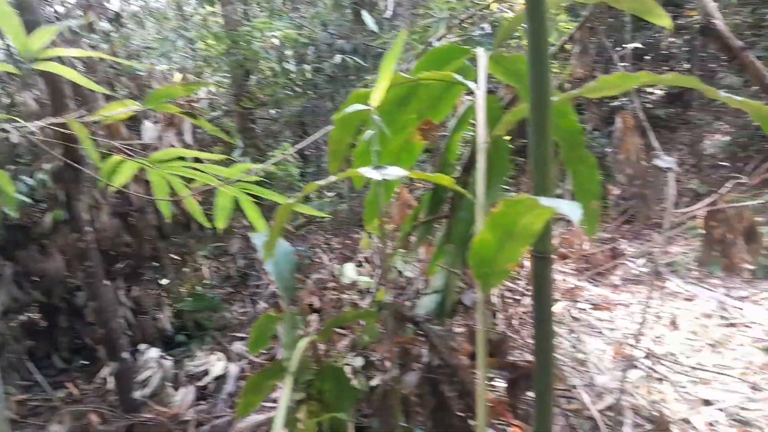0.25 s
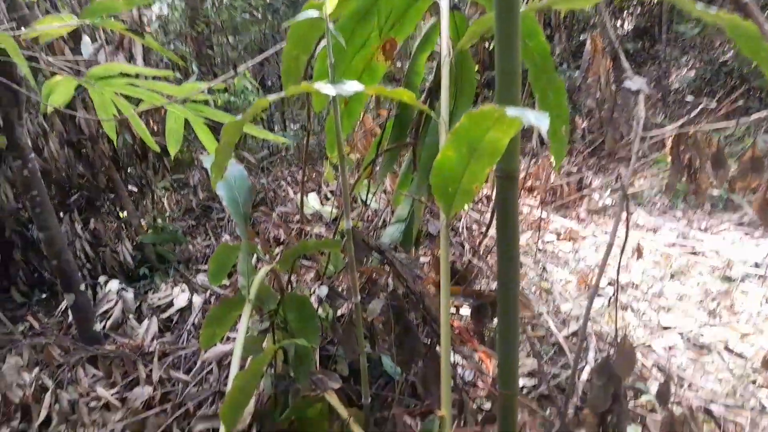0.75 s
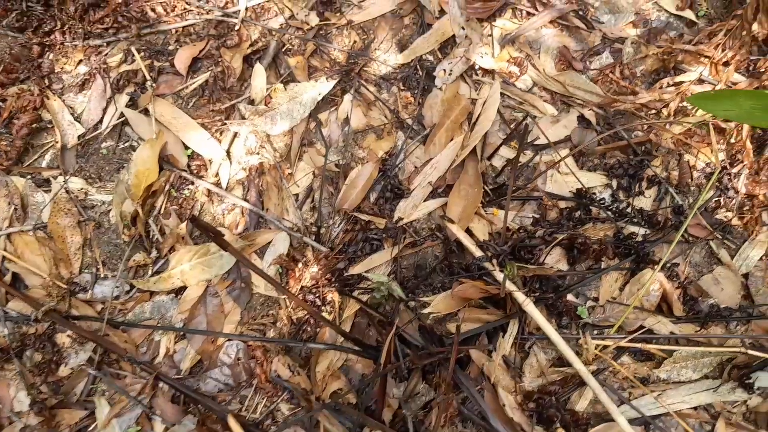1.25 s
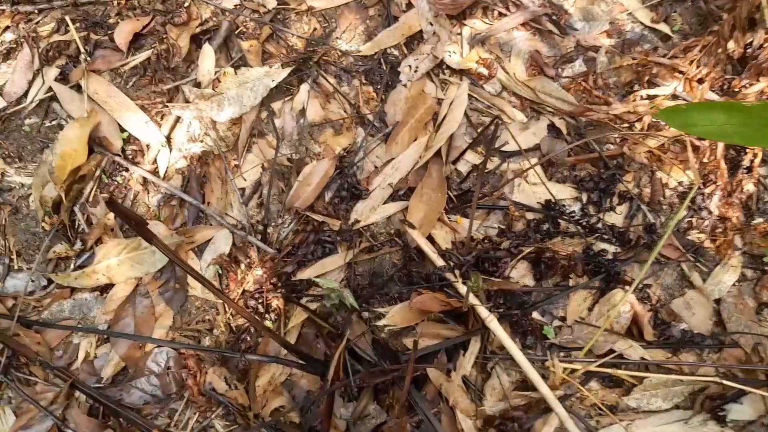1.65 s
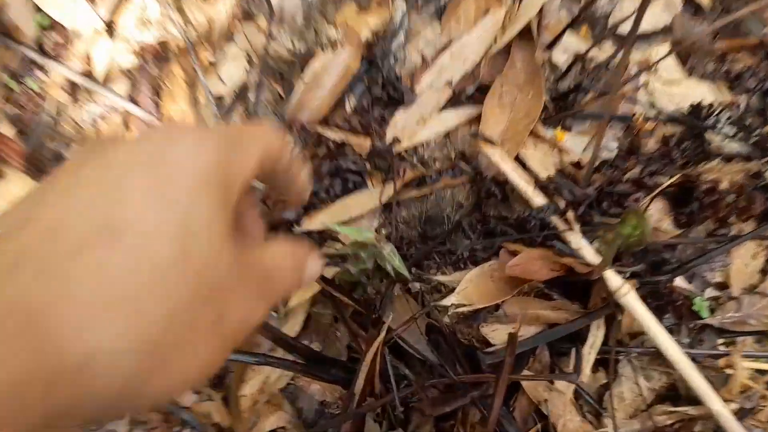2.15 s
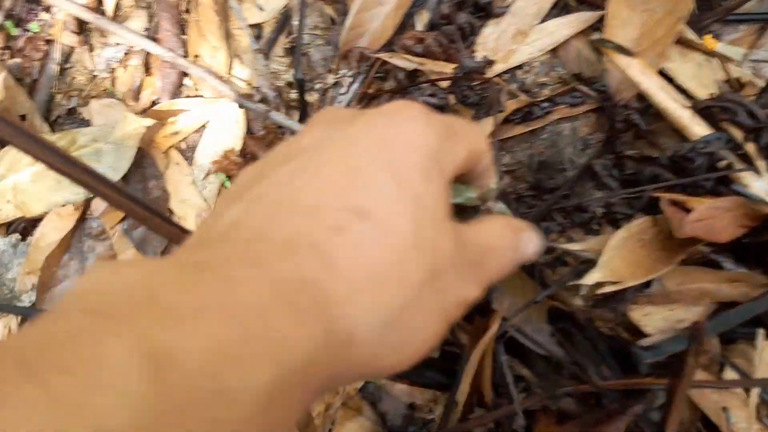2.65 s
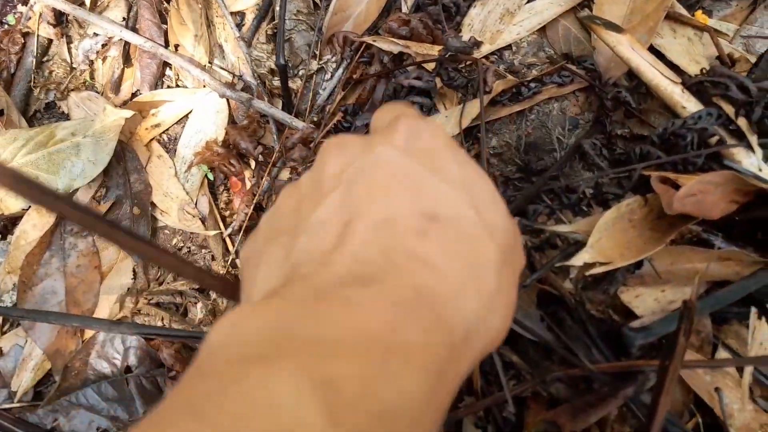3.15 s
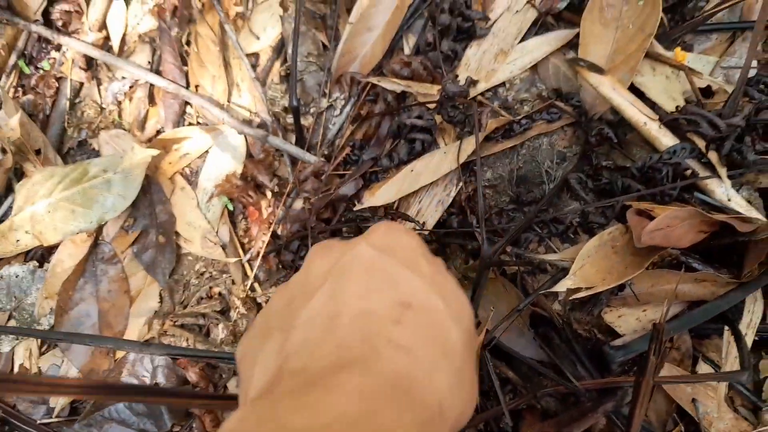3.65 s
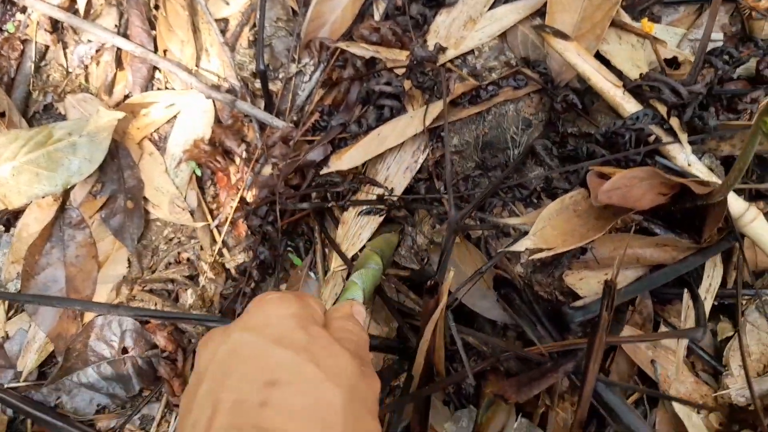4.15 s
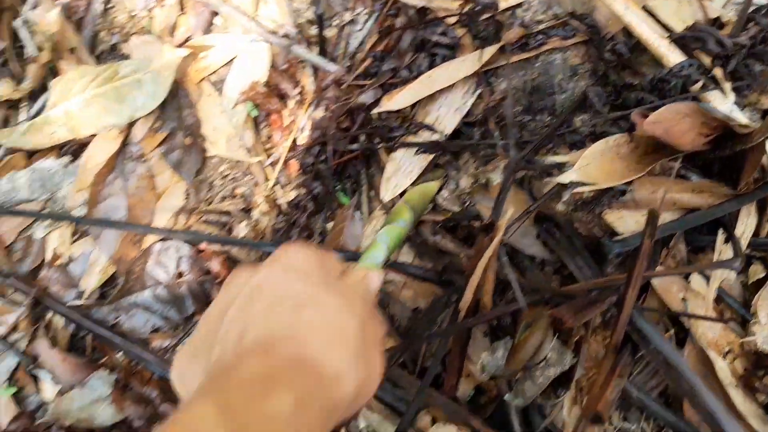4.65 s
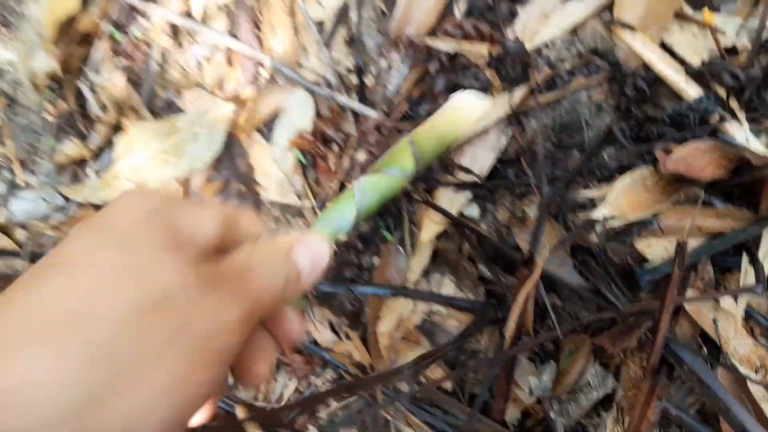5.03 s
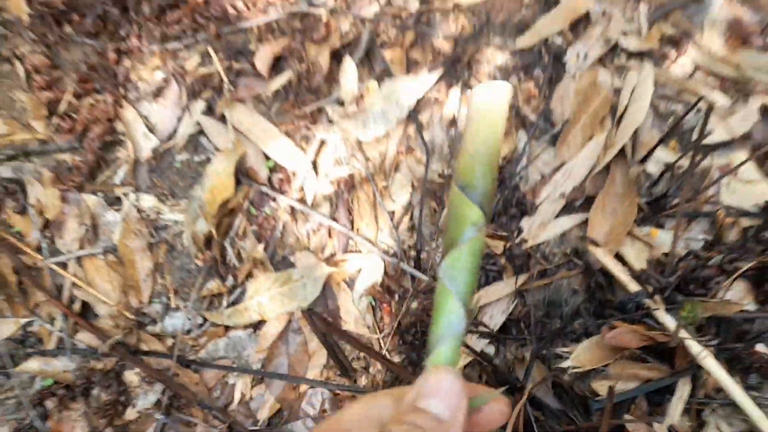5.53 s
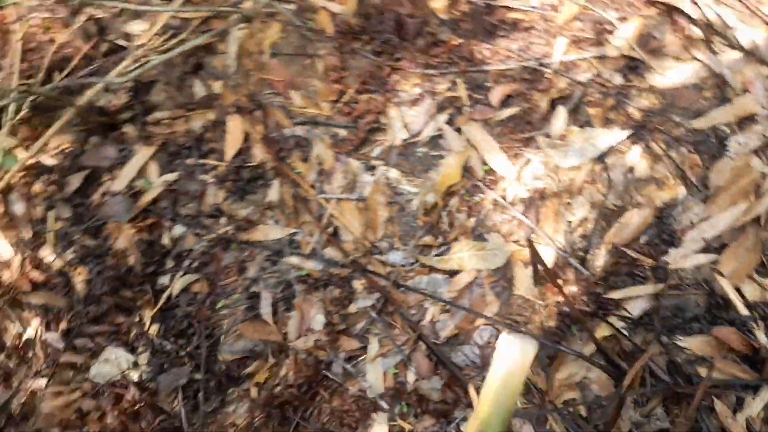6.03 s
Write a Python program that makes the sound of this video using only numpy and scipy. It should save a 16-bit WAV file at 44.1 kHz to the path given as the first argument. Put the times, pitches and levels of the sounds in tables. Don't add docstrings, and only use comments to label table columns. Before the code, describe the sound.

A hand-held stereo microphone close to a dry forest floor. From 0 to 0.95 s leaves rustle softly over a thin cricket trill and raspy cicadas; a distant bird whistles a rising, a falling and a low note, and a rough foot scuff bursts at 0.85-0.95 s before an abrupt cut. The cicadas become quieter. Soft bumps at 1.46 and 1.8 s and a stuttering finger lead to rustling and leaf ticks from 2 s, with grip creaks near 2.65 s. High chips and faint calls sound around 3-3.5 s. Very loud, dry snaps hit at 3.85-3.97 s, then fibres pop from 4.0 to 4.7 s, and another cluster of cracks comes at 4.75-4.86 s. Rustle and small ticks settle. From 5.7 s the three-note whistle returns nearer; from 5.9 s leaves crunch underfoot while low handling rumble and creaking swell to the end at 6.3 s.

```python
import sys
import numpy as np
from scipy import signal
from scipy.fft import rfft, irfft, next_fast_len
from scipy.io import wavfile
from scipy.ndimage import uniform_filter1d, map_coordinates

SR = 44100
rng = np.random.default_rng(int(sys.argv[2]) if len(sys.argv) > 2 else 0)


def put_to_file(sound):
    columns = np.atleast_2d(sound).T
    safe = np.clip(columns, -1, 1)
    whole_steps = np.round(safe * 32767)
    wavfile.write(sys.argv[1], SR, whole_steps.astype(np.int16))


def gain_from_db(level_db):
    decades = np.asarray(level_db, float) / 20
    return 10 ** decades


N = 277389
SCENE_CHANGE_S = 0.957


# peak t/s, level/dB, swell t/s, fade t/s, extra dull level/dB
STIRS = [(.37, -58, 0.59, 1.94, -9), (1.22, -80, .1, 0.31, -25), (.73, -74, 0.08, 0.13, 6),
         (2.0, -71.5, 0.46, 0.82, 6.5), (2.2, -53.5, 0.73, 0.76, -12.5), (2.3, -60.5, 0.56, 0.072, -0.5),
         (2.5, -62, 0.77, 1.3, -14), (3.08, -71, 0.054, 0.27, -4), (3.44, -62, 0.23, 1.1, -21),
         (4.42, -64, 0.66, 0.33, -21), (4.82, -65, 0.3, 0.38, 1), (4.91, -56.5, 0.76, 0.064, -9.5),
         (5.31, -66, 0.98, 0.84, -25), (5.61, -61.5, 0.54, 5.7, -47), (5.84, -62, 0.86, 0.099, -2.5),
         (6.0, -61.5, 0.24, 0.53, 4.5), (6.1, -52, 0.51, 0.69, 1.5), (6.25, -72, 0.73, 0.51, 13)]
# dull level/dB, crisp level/dB, fizz level/dB
CALM = [
    (-99, -71, -80),
    (-106, -99, -98),
]
# f/Hz, level per Hz/dB
DULL = [(350, -16), (600, -10.5), (704, -10), (1090, -4.5), (2600, -12), (3380, -50), (5720, -120)]
CRISP = [(1400, -41.5), (1750, -13), (2600, -15), (3500, -15), (4300, -12.5), (5100, -16.5), (6000, -15.5),
         (7800, -13), (8500, -16.5), (9300, -44)]
FIZZ = [(7500, -57), (9300, -10), (10800, -6), (14000, -8), (15600, -8), (15800, -33), (16000, -120)]


def litter():
    dull_calm, crisp_calm, fizz_calm = np.transpose(CALM)
    dull_db = swells(STIRS, 1, by_scene(*dull_calm))
    crisp_db = swells(STIRS, 0.57, by_scene(*crisp_calm))
    fizz_db = swells(STIRS, 0, by_scene(*fizz_calm))
    happens = rng.random(N) < 300 / SR * gain_from_db(5 * wobble(14))
    cracks = happens * gain_from_db(np.minimum(4 * rng.exponential(size=N), 12))
    grain = 1 + 1.9 * signal.lfilter([1], [1, -.97], cracks)
    dull = coloured(pair(0.038) * grain ** 0.48, DULL)
    crisp = coloured(patchy(pair(0.028), 1.5) * grain ** 0.6, CRISP)
    fizz = coloured(pair(0.029) * grain ** 0.51, FIZZ)
    rustle = gain_from_db(dull_db + 1.5 + 2 * wobble(26)) * dull
    rustle += gain_from_db(crisp_db + 6.5 + wobble(11)) * crisp
    return rustle + gain_from_db(fizz_db - 5.5 + 0.24 * wobble(27)) * fizz


# t/s, level/dB
SCUFF = [
    (.83, -66),
    (.845, -46),
    (.884, -49),
    (.887, -35),
    (.9, -37),
    (.925, -39.5),
    (.955, -44.5),
    (.958, -65),
]
# f/Hz, level per Hz/dB
DRAG = [(59, -19), (100, -4.5), (500, -6), (1500, -14.5), (1780, -6), (2070, -8.5), (2670, 1), (3090, -3),
        (7850, -2), (9300, -15), (13000, -11.5), (15800, -10)]


def scuff():
    level_db = curve(SCUFF) + 0.4 * wobble(300) + 1.03 * wobble(90)
    return gain_from_db(level_db) * coloured(pair(0.022), DRAG)


# f/Hz, width f/Hz, level/dB
WOODY = [(505, 690, -1), (1600, 2230, 3.5), (2520, 3080, 2.5)]
BRITTLE = [(4180, 1810, 3), (5700, 2460, 4), (7880, 1380, -4.5)]
BRIGHT = [(11300, 5200, -3), (14130, 2700, -0.5)]


def snapping(rows):
    t = np.arange(SR // 25) / SR
    parts = np.zeros((3, 2, N + len(t)))
    for s, db, woody_db, bright_db, pan_db in rows:
        main = gain_from_db(-60 * t / (0.0056 + db / 14000))
        tail = gain_from_db(-13 - 60 * t / 0.018) + gain_from_db(-28 - 60 * t / 0.035)
        shape = (main + tail) * np.minimum(t / 0.0001, 1)
        shared, own = rng.standard_normal(len(t)), rng.standard_normal((2, len(t)))
        shared[round(0.0001 * SR)] += 5
        bursts = (shared + np.array([.3, .7, .8])[:, None, None] * own) * shape
        bursts *= np.linalg.norm(shape) / np.linalg.norm(bursts, axis=2, keepdims=True)
        gains = gain_from_db(db + np.array([woody_db + 6.5, 8, bright_db + 5]))[:, None]
        gains = gains * gain_from_db(np.outer([.2, 1, 1], [pan_db, -pan_db]) / 2)
        start = round(s * SR)
        parts[..., start:start + len(t)] += gains[..., None] * bursts
    x = sum(resonant(p[:, :N], modes) for p, modes in zip(parts, (WOODY, BRITTLE, BRIGHT)))
    x[1] = filtered(x[1], lambda hz: gain_from_db(6.3 * (hz / 13000) ** 2) * np.exp(-2j * np.pi * hz * 0.00011))
    return x + gain_from_db(-24) * forest(x.mean(0))


def cracks_of(rows, wood_db, bright_db):
    return [(s, db, wood_db, bright_db - 0.5 * (db + 43), pan_db) for s, db, pan_db in rows]


# t/s, peak level/dB, woody level/dB, bright level/dB, left-right level/dB
TWIGS = [(2.7348, -45, -3, -6, 14), (2.7369, -44.5, -5, 1, 6), (2.7405, -47, -5, -4, -9),
         (3.8507, -12.5, -16.5, -2.5, 5), (3.942, -11, -4, -16, -1), (3.9436, -14.5, -6, -22, -4),
         (3.9573, -21.5, -3, -11, -17), (3.9713, -14, -8, -10, 4.5), (4.0034, -35.5, -9, 1, -4),
         (4.4532, -38, -5, -4.5, -8), (4.7345, -36, -9, -24, 8), (4.77, -27, -13, -6.5, 5),
         (4.7916, -26, -4, -18, -18.5), (4.8076, -28, -2, -3, 14), (4.8155, -22.5, -5.5, -19, -11),
         (4.823, -18.5, -3.5, -10, 7.5), (4.8569, -33, -4.5, -8.5, -5), (4.9901, -55.5, 16, -36.5, 4),
         (3.078, -61.5, 10, -12, 4), (3.092, -61, 8, -10, 2), (1.147, -67.5, -5, -20, -12)]


def twigs():
    return snapping(TWIGS)


# t/s, peak level/dB, left-right level/dB
FIBRES = [(2.3797, -42, -5.5), (2.517, -41.5, -6), (2.5717, -43, 2), (3.3132, -61, -25), (3.832, -55, -9),
          (3.9804, -38.5, -6), (3.9885, -46, -2), (4.008, -34, 6), (4.0506, -42, -2), (4.2359, -36.5, -3),
          (4.2872, -31.5, -1), (4.3139, -38, -2), (4.3222, -32.5, 0), (4.3608, -39, -3), (4.3898, -35.5, 2),
          (4.412, -52.5, -5), (4.43, -42.5, -3), (4.4605, -39, -2), (4.5007, -32, -3), (4.5184, -54, -4),
          (4.5587, -34, -4.5), (4.6097, -31.5, -4), (4.7004, -43, 17), (4.7043, -41, -11),
          (4.7144, -35, 8.5), (4.7394, -36, -7), (4.762, -54, 2), (4.8195, -30, -9), (4.9569, -44, -9),
          (5.1074, -47, -11)]


def fibres():
    return snapping(cracks_of(FIBRES, wood_db=-59, bright_db=-0.5))


# t/s, peak level/dB, left-right level/dB
CRUNCH = [(5.9254, -33, 5.5), (5.9294, -35.5, 12), (5.941, -62, 6), (6.002, -35, -5), (6.048, -38, -4),
          (6.108, -35.5, -3), (6.137, -36, -4), (6.247, -38, -5), (6.0838, -36.5, -16), (6.0961, -36.5, -4),
          (6.1624, -32, 2), (6.1706, -35.5, 13), (6.2053, -34.5, 13), (6.2382, -33.5, 9), (6.2681, -34, 13),
          (6.2746, -32, -8)]


def last_step():
    return snapping(cracks_of(CRUNCH, wood_db=4.5, bright_db=-4))


# t/s, peak level/dB, left-right level/dB
TICKS = [(2.0378, -57, -5), (2.182, -52, -7), (2.2288, -44.5, -5), (2.3171, -56, -5.0), (2.336, -49, -13),
         (2.3595, -52, 0), (2.4149, -38, -2.0), (2.4594, -54, -3.0), (2.6314, -52, -7.5), (2.6576, -48, -5),
         (2.6786, -40.5, 5), (2.0535, -44, -8), (2.2899, -46, -4), (2.5035, -54, 4), (2.5533, -53, -1),
         (2.8028, -66, 4), (3.2984, -58.5, 5), (3.3862, -56, -15), (3.4451, -55, -17), (3.551, -49, -7),
         (3.6446, -59, -7), (3.6905, -61, -10), (3.7174, -59, -3), (5.051, -47, -7), (5.3403, -55, -13.5),
         (5.3976, -60, -17), (5.459, -51, -6), (5.4814, -60, -13), (5.5823, -46.5, -12), (5.662, -56, -5),
         (5.7256, -52, -12), (5.7347, -49, -8), (5.879, -51, -16)]


def leaf_ticks():
    return snapping(cracks_of(TICKS, wood_db=-15, bright_db=-3))


# peak t/s, rumble level/dB, swell t/s, fade t/s, rubbing over rumble level/dB
GRIP = [(.36, -75, 0.43, 0.96, 8), (1.44, -76.5, 1.4, 1.3, -30), (1.73, -66, 0.06, .45, -2),
        (1.84, -56, 0.3, 0.22, -5), (1.96, -72.5, 0.64, 0.24, 14), (2.12, -61, 0.77, 0.2, 1),
        (2.3, -69, 0.23, 0.17, 6), (2.65, -48.5, 0.11, 0.16, -0.5), (4.25, -69, 0.19, 0.11, -2),
        (4.87, -72, 0.49, 3, -9), (5.23, -86.5, 0.067, 0.2, 18.5), (1.125, -82, .03, 0.041, 13),
        (1.39, -63, 0.009, 0.055, -21), (5.76, -76, 0.15, 0.46, 19), (5.99, -47, 0.38, 0.19, -9),
        (6.13, -40, 0.27, 0.76, -17), (6.29, -36, 0.14, 0.25, -8)]
# f/Hz, level per Hz/dB
RUMBLE = [(15, -59.5), (45, -7), (70, 0.5), (92, -6), (161, -14), (260, -23.5), (340, -30), (570, -120)]
RUBBING = [(110, -43), (180, -7), (338, -4), (559, -4), (1000, -22.5), (1300, -64), (2200, -120)]


def grip():
    rumble_db, rub_db = swells(GRIP, 0, -77.5), swells(GRIP, 0.86, -107)
    rumble = gain_from_db(rumble_db + 7) * unit(gain_from_db(1.65 * wobble(22)) * coloured(pair(0.099), RUMBLE))
    rub = gain_from_db(rub_db) * unit(gain_from_db(2.5 * wobble(70)) * coloured(pair(.9), RUBBING))
    near = gain_from_db(np.clip((rumble_db + 92.5) * 0.05, 0, 5) * [[1], [-1.5]])
    return near * (rumble + rub)


# f/Hz, time to fall 60 dB t/s
CASE = [
    (112, 0.051),
    (1400, 0.0078),
]


def slipping(rows):
    slips, t = np.zeros(N + SR), np.arange(SR // 5) / SR
    (boom_hz, boom_t60), (tick_hz, tick_t60) = CASE
    for s, db, boom_db, hz in rows:
        scatter = np.clip(rng.standard_normal(2), -1.5, .6)
        tick = gain_from_db(-7 + 5.9 * scatter[0]) * ring(t, tick_hz * (1 + 0.22 * scatter[1]), tick_t60, 0.000067)
        boom = gain_from_db(boom_db + 2.5) * ring(t, boom_hz, boom_t60, 0.0053)
        knock = gain_from_db(12.5) * ring(t, hz, 0.012, 0.0011)
        slips[round(s * SR):][:len(t)] += gain_from_db(db) * (boom + knock + tick)
    return through_case(slips)


def through_case(x):
    return np.array([np.roll(x, 20), x])[:, :N] * gain_from_db([[3], [-8]])


# t/s, peak level/dB, boom level/dB, f/Hz
CREAKS = [(1.947, -51, -28, 490), (2.074, -41, -26, 300), (2.099, -45.5, 0, 298), (2.128, -50.5, 0, 360),
          (2.599, -46.5, 3, 380), (2.609, -48, -12, 430), (2.619, -44, -13, 420), (2.628, -36, 5, 480),
          (2.641, -34.5, 6, 256), (2.658, -33.5, 1, 445), (2.674, -34.5, -10, 225), (2.679, -38, 10, 416),
          (2.712, -45.5, -6, 343), (5.926, -51, 15, 234), (5.983, -43, 9.5, 287), (6.02, -35.5, 12, 312),
          (6.031, -33, 0, 378), (6.051, -33, -8, 235), (6.061, -35, 14, 345), (6.087, -30.5, 2, 386),
          (6.115, -33, 1, 372), (6.1784, -28, 8, 420), (6.205, -25, 6, 395), (6.233, -24.5, 6.5, 400),
          (6.249, -26, 5, 443), (6.269, -20, -4, 330), (6.2744, -20, -16, 306)]


def creaks():
    return slipping(CREAKS)


# t/s, peak level/dB
STUTTER = [(1.685, -60), (1.698, -59), (1.711, -58), (1.719, -55), (1.74, -51), (1.75, -53), (1.76, -54),
           (1.772, -58), (1.782, -57), (1.816, -52), (1.826, -47), (1.837, -50), (1.847, -49), (1.863, -47),
           (1.877, -53), (1.887, -53), (1.9, -57), (1.914, -57)]


def stutter():
    return slipping([(s, db, -17, 400) for s, db in STUTTER])


# t/s, peak level/dB, f/Hz
THUDS = [
    (1.463, -32, 92.4),
    (1.786, -35, 117.7),
    (4.828, -35, 106),
]


def thuds():
    x, t = np.zeros(N + SR), np.arange(SR // 5) / SR
    for s, db, hz in THUDS:
        x[round(s * SR):][:len(t)] -= gain_from_db(db) * ring(t, hz, 0.061, 0.0022)
    return through_case(x)


# t/s, f/Hz, level/dB
FAR_PHRASE = [
    [(.205, 2800, -69.5), (.225, 2870, -65), (.26, 3034, -61.5), (.3, 3040, -68), (.39, 3000, -75)],
    [(.386, 3275, -65), (.44, 3184, -51.5), (.48, 3048, -49.5), (.52, 2957, -57.5), (.55, 2915, -50.5),
     (.565, 2730, -72)],
    [(.668, 2806, -57.5), (.7, 2797, -58), (.78, 2771, -46.5), (.81, 2807, -61.5), (.872, 2826, -48.5),
     (.89, 2630, -52.5), (.94, 2490, -62)],
]
NEAR_PHRASE = [
    [(5.7, 2840, -66), (5.716, 3020, -56), (5.732, 3053, -50), (5.755, 3110, -60), (5.776, 3116, -48.5),
     (5.8, 3070, -71), (5.888, 3300, -83)],
    [(5.892, 3245, -63), (5.912, 3290, -52), (5.944, 3220, -56.5), (5.96, 3207, -43.5), (6.0, 3067, -40.5),
     (6.036, 3016, -40), (6.062, 2936, -51)],
    [(6.172, 2920, -49), (6.185, 2845, -41.5), (6.21, 2825, -42.5), (6.235, 2826, -43.5),
     (6.261, 2833, -36.5), (6.3, 2820, -36)],
]


def whistler():
    before, near = sing(FAR_PHRASE, .6, 10), sing(NEAR_PHRASE, .6, 10)
    echoes = gain_from_db(-5) * by_scene(1, 0) * forest(before) + gain_from_db(-11) * forest(near)
    return both_sides(gain_from_db(-6) * (before + near)) + echoes


# start t/s, length t/s, top f/Hz, level/dB, final drop f/Hz
CHIPS = [
    (1.663, 0.045, 7380, -62.5, 506),
    (1.701, 0.1, 6800, -75, -2.5),
    (3.065, 0.047, 7910, -54.5, 1908),
    (3.428, 0.05, 7100, -64, 2106),
    (3.54, 0.064, 7140, -63.5, 1890),
    (3.522, 0.071, 6070, -68, 21),
    (4.169, 0.053, 7350, -55.5, -200),
    (5.198, 0.045, 7400, -56.5, 29),
]


def chipper():
    u = np.linspace(0, 1, num=12)
    notes = []
    for s, length, top, db, drop in CHIPS:
        swoop, ending = np.exp(-u * length / 0.0047), u ** 6.4
        hz = top - 2000 * swoop - drop * ending
        notes.append(np.transpose([s + u * length, hz, db - 9.5 * (swoop + .5 * ending)]))
    chips = sing(notes, 3, 90) * gain_from_db(4 * wobble(350))
    return both_sides(gain_from_db(-1.5) * chips) + gain_from_db(-2.5) * forest(chips)


# start t/s, first f/Hz, level/dB
GLIDES = [
    (1.143, 2885, -76),
    (2.91, 2824, -76),
    (3.14, 2730, -75.5),
    (3.395, 3050, -77),
    (4.953, 4640, -72),
    (5.18, 3200, -80),
    (5.421, 2880, -74.5),
]
# start t/s, length t/s, first f/Hz, last f/Hz, level/dB
HELD = [
    (1.46, 0.69, 2437, 2365, -81),
    (1.66, .09, 760, 830, -77),
    (3.0, .3, 2700, 3130, -74),
    (3.29, .11, 3110, 3030, -75),
    (1.18, .2, 2600, 3000, -80),
    (1.32, .07, 3000, 3700, -78),
]


def far_birds():
    t, u = np.linspace(0, 0.048, num=12), np.linspace(0, 1, num=12)
    fall = 1 - 0.41 * (1 - np.exp(-t / 0.022))
    notes = [np.transpose([s + t, hz * fall, db + 0 * t]) for s, hz, db in GLIDES]
    left = np.exp(-u / .35)
    for s, length, first, last, db in HELD:
        notes.append(np.transpose([s + u * length, last + (first - last) * left, db - 12 * left]))
    far = sing(notes, 1.5, 25)
    return both_sides(gain_from_db(-7) * far) + forest(far)


def sing(notes, waver_db, waver_hz):
    x, drift = np.zeros(N), waver_hz * wobble(50)
    for rows in notes:
        s, hz, db = np.transpose(rows)
        n = np.arange(int(s[0] * SR), min(int(s[-1] * SR), N))
        ends = np.minimum(np.minimum(n - n[0], n[-1] - n) / (0.0014 * SR), 1)
        phase = 2 * np.pi * np.cumsum(np.interp(n / SR, s, hz) + drift[n]) / SR
        x[n] += ends * gain_from_db(np.interp(n / SR, s, db) + 7) * np.sin(phase)
    return x * gain_from_db(waver_db * wobble(45))


def both_sides(x):
    return np.array([x, np.roll(x, 2)])


# f/Hz, time to fall 60 dB t/s
TREES = [(300, 0.24), (3000, 0.57), (8000, 0.36), (15000, 0.096)]


def forest(x):
    hz, t, z = signal.stft(rng.standard_normal((2, SR // 2)), SR, nperseg=256)
    tail = signal.istft(z * gain_from_db(-60 * t / along(TREES, hz)[:, None]), SR, nperseg=256)[1]
    return signal.fftconvolve(x[None], tail / np.linalg.norm(tail[0]), axes=1)[:, :N]


# t/s, cricket level/dB
CHORUS = [(0.0, -59), (0.79, -59), (0.955, -58), (0.96, -61), (1.27, -66), (2.2, -55), (2.9, -61),
          (3.85, -58), (4.28, -62.5), (4.7, -58.5), (5.64, -61.5), (5.89, -59), (6.29, -61)]
# f/Hz, width f/Hz, level/dB
CRICKET = [(4270, 36, -3.5), (4250, 79, -5), (4430, 570, -21)]
CICADAS = [(7340, 250, -1), (7680, 76, 7), (8080, 66, 1.5)]


def insects():
    cricket_db = curve(CHORUS)
    cicada_db = by_scene(-57.5, -67.5) + 0.2 * (cricket_db - cricket_db.mean())
    flutter = gain_from_db(0.89 * wobble(21.64))
    cricket = unit(resonant(resonant(pair(0), CRICKET), [(4314, 163, 0)]))
    strength = uniform_filter1d(abs(cricket), size=1300)
    cricket = unit(flutter * cricket / (0.1 + strength) ** .7)
    rasp = 1 + 0.16 * np.sin(2 * np.pi * np.cumsum(35 + 3 * wobble(0.76)) / SR)
    band = filtered(resonant(pair(0), CICADAS), lambda hz: 1 / (1 + ((hz - 7620) / 760) ** 4))
    return gain_from_db(cricket_db + 0.5) * cricket + gain_from_db(cicada_db + 1.5) * unit(rasp * band)


# f/Hz, level per Hz/dB
STILL = [(450, -27.5), (900, -68), (1500, -48), (1900, -29), (2800, -20), (3450, -24.5), (4450, -5.5),
         (5000, -29), (6500, -33), (7600, -22), (8500, -30), (9300, -50), (11500, -41), (15600, -45),
         (15900, -120)]


def still_forest():
    hush = coloured(patchy(pair(0.022), 2.5), STILL)
    return gain_from_db(by_scene(-70, -74) + 0.61 * wobble(2.4)) * hush


def unit(x):
    return x / np.sqrt(np.mean(x ** 2) + 1e-20)


def along(points, hz):
    f, v = np.transpose(points)
    return np.interp(np.log(hz + 1), np.log(f + 1), v)


def curve(rows):
    s, values = np.transpose(rows)
    return np.interp(np.arange(N) / SR, s, values)


def wobble(rate):
    return map_coordinates(rng.standard_normal(int(N * rate / SR) + 4), [np.arange(N) * rate / SR])


def by_scene(first, second):
    return np.where(np.arange(N) < SCENE_CHANGE_S * SR, first, second)


def swells(rows, follows, rest_db):
    s, db, swell, fade, colour_db = np.transpose(rows)[:, :, None]
    t = np.linspace(0, N / SR, num=3000)
    away = np.maximum((s - t) / np.abs(swell), (t - s) / np.abs(fade))
    same_scene = (s < SCENE_CHANGE_S) == (t < SCENE_CHANGE_S)
    power = np.sum(gain_from_db(db + follows * colour_db - 39 * away) ** 2 * same_scene, axis=0)
    return 10 * np.log10(np.interp(np.arange(N) / SR, t, power) + gain_from_db(rest_db) ** 2)


def filtered(x, response):
    m = next_fast_len(N + SR // 2)
    return irfft(rfft(x, m) * response(np.fft.rfftfreq(m, 1 / SR)), m)[..., :N]


def resonant(x, modes):
    def response(f):
        return sum((-1) ** k * gain_from_db(db) * 1j * f * w / (c * c - f * f + 1j * f * w)
                   for k, (c, w, db) in enumerate(modes))
    return filtered(x, response)


def ring(t, hz, t60, attack):
    return gain_from_db(-60 * t / t60) * (1 - np.exp(-t / attack)) * np.sin(2 * np.pi * hz * t)


def pair(alike):
    a, b = rng.standard_normal((2, N))
    turn = np.arccos(np.clip(alike, -1, 1)) / 2
    return np.array([np.cos(turn) * a + np.sin(turn) * b, np.cos(turn) * a - np.sin(turn) * b])


def coloured(x, spectrum):
    return unit(filtered(x, lambda hz: gain_from_db(along(spectrum, hz))))


def patchy(x, depth_db):
    z = signal.stft(x, nperseg=512)[2]
    field = uniform_filter1d(uniform_filter1d(rng.standard_normal(z.shape[1:]), 8, 0), 24, 1)
    return signal.istft(z * gain_from_db(depth_db * unit(field)), nperseg=512)[1][:, :N]


def scene():
    leaves = litter() + scuff()
    breaks = twigs() + fibres() + last_step() + leaf_ticks()
    hand = grip() + creaks() + stutter() + thuds()
    birds = whistler() + chipper() + far_birds()
    return leaves + breaks + hand + birds + insects() + still_forest()


def roll_off(x):
    return signal.sosfilt(signal.butter(12, 17080, fs=SR, output="sos"), x)


def record(dry):
    mix = filtered(dry, lambda hz: (1j * hz / (52 + 1j * hz)) ** 3 / (1 + (hz / 16000) ** 80))
    return roll_off(mix)


dry = scene()
out = record(dry)
put_to_file(out)
```